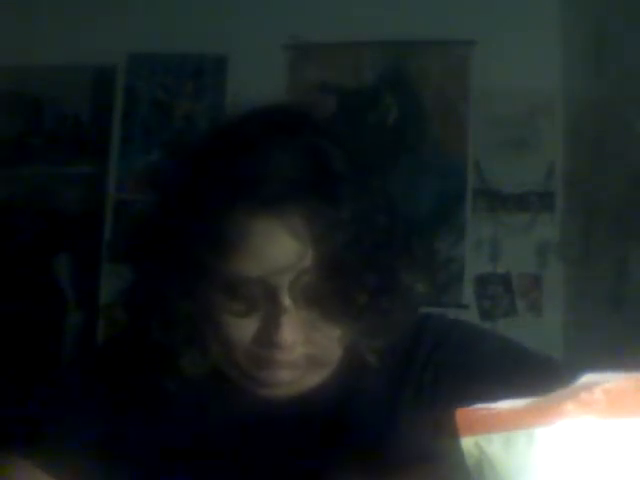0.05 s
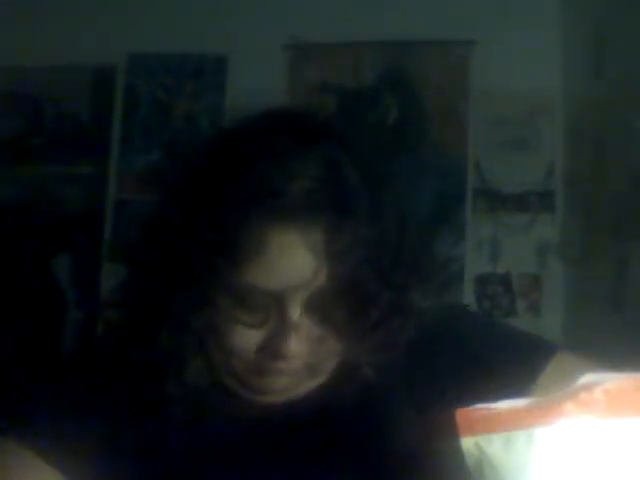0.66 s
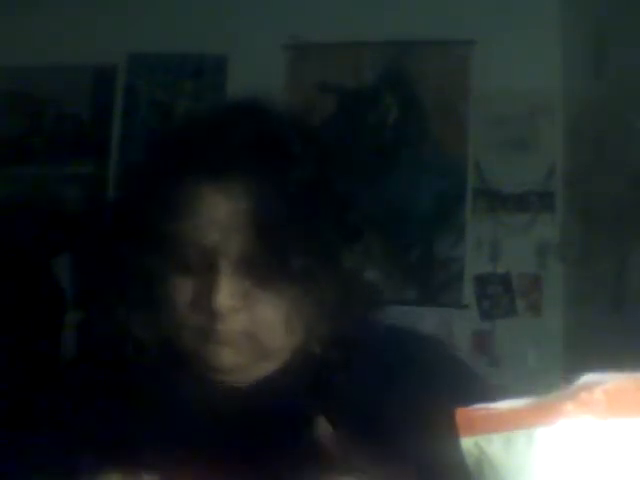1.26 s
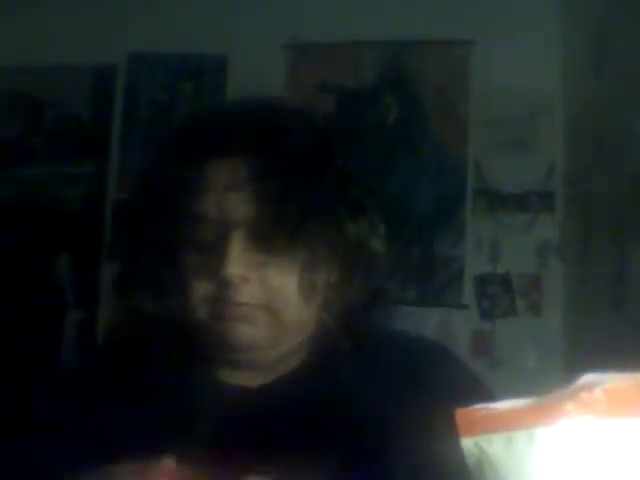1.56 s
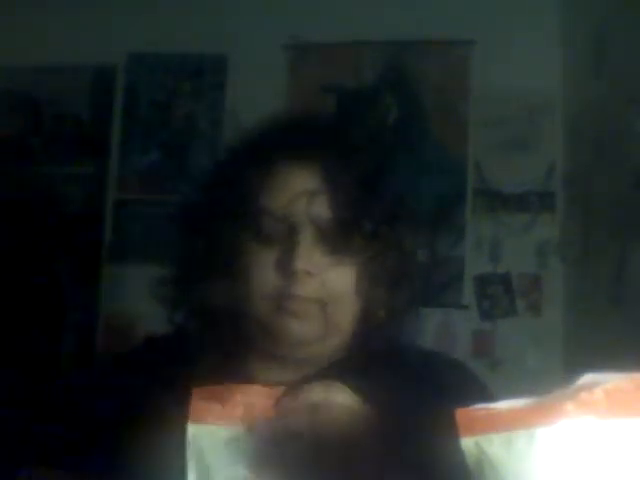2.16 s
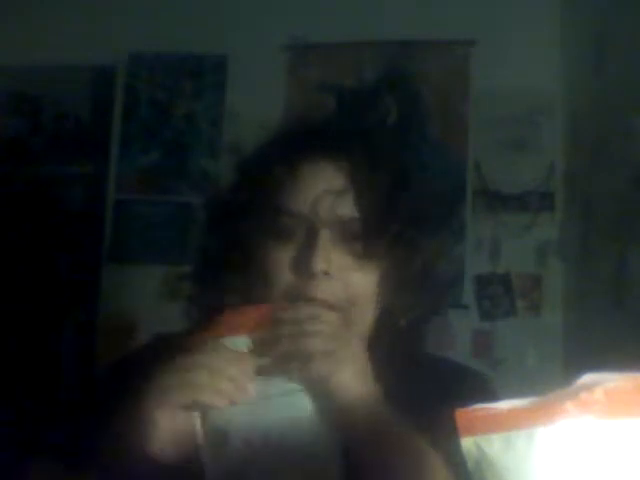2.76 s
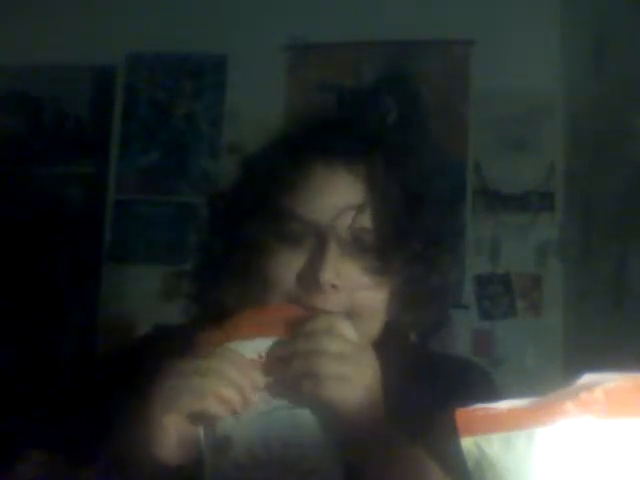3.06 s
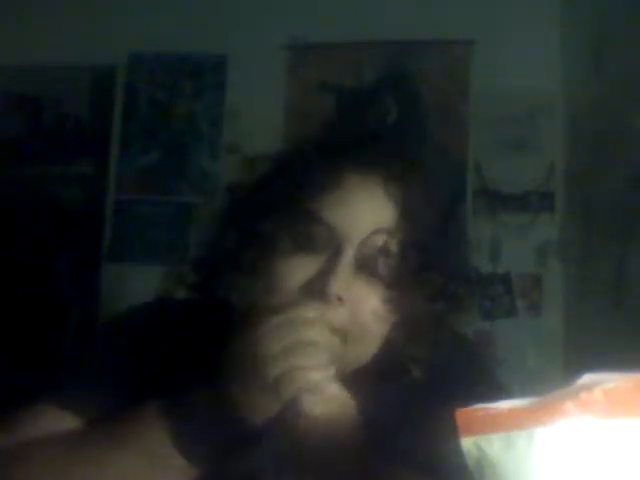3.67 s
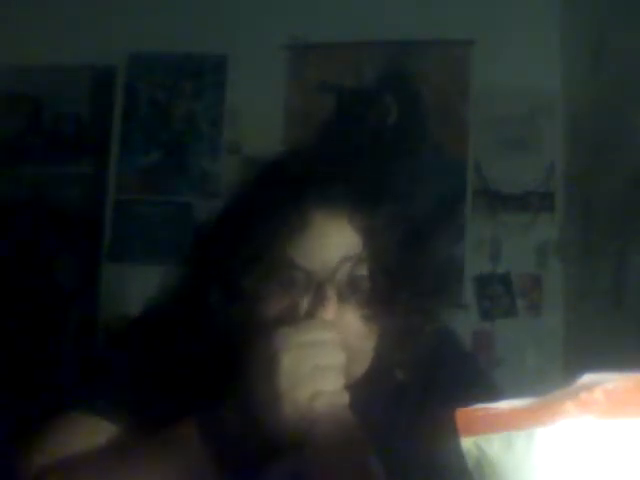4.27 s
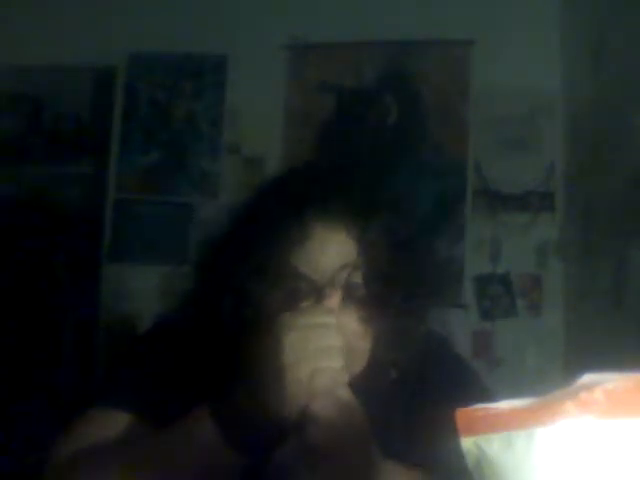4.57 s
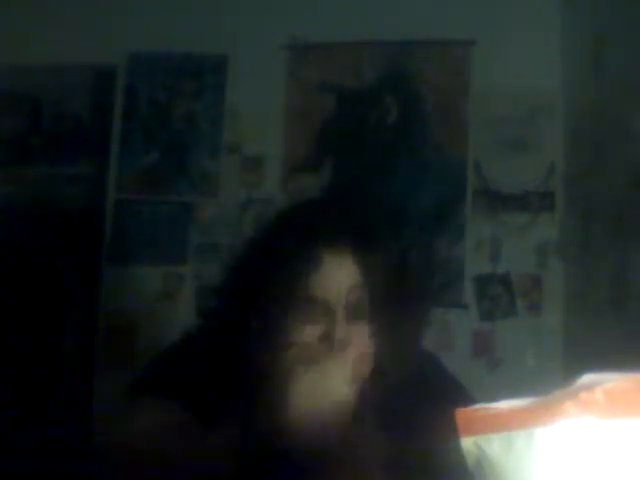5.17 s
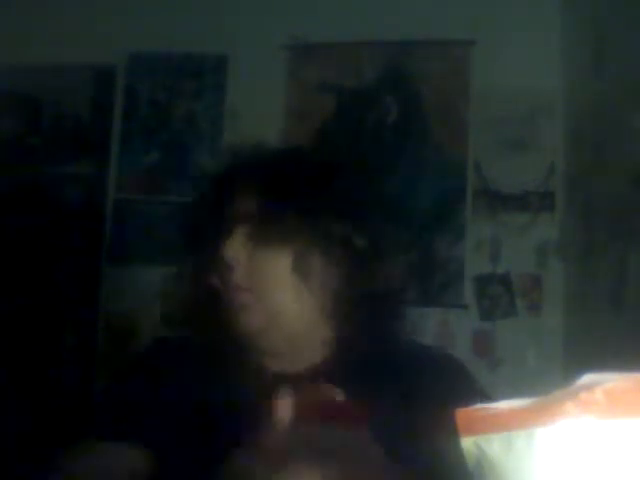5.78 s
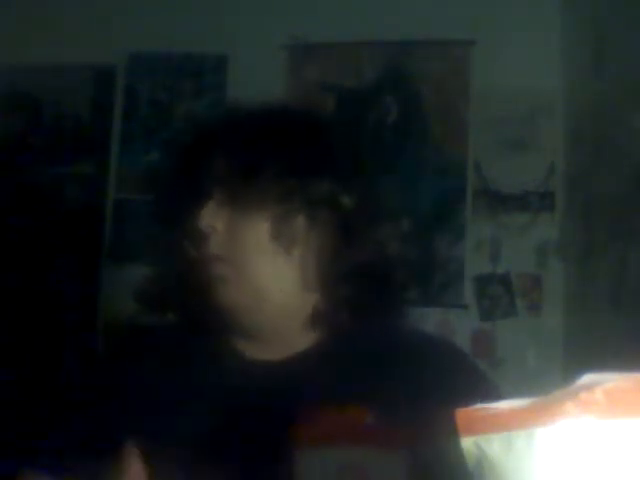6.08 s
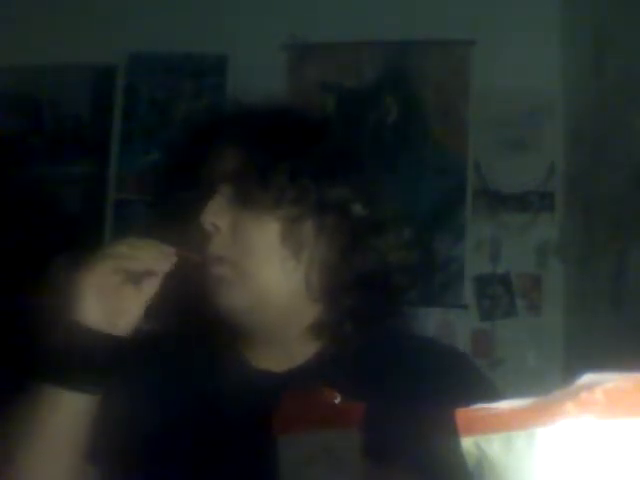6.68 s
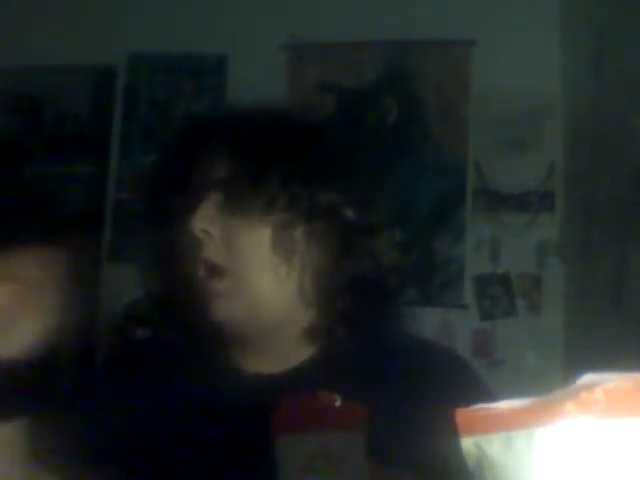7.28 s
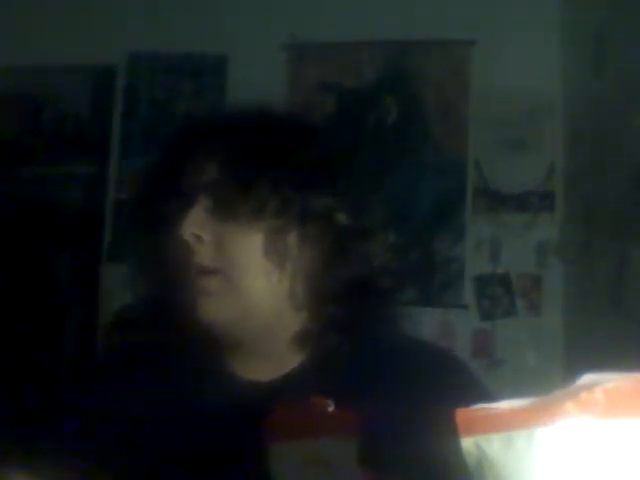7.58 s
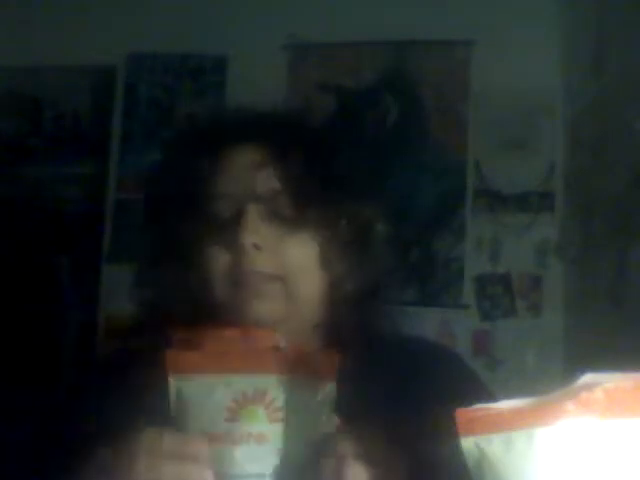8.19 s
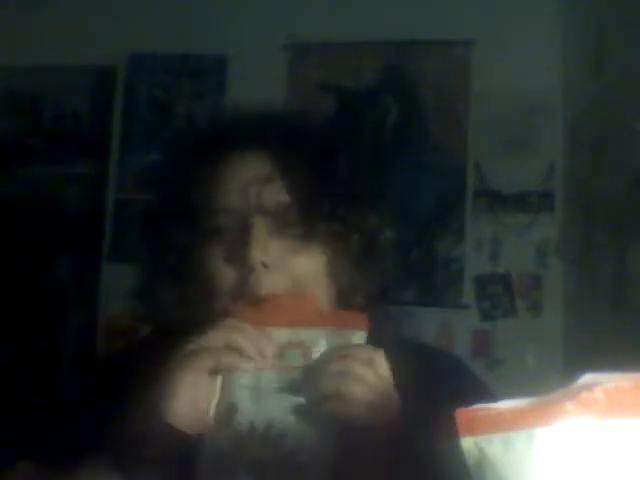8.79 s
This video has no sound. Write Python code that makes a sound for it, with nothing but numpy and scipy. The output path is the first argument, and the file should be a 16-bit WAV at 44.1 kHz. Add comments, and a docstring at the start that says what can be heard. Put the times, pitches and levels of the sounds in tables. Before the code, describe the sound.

Close, sharp crackling of a plastic snack bag being tugged open, with one short rip, a pause, then more crinkling.

```python
"""In a bedroom, a stiff plastic snack bag is handled, bitten and pulled close to a small microphone.
Creases snap by buckling, each exciting a sharp crack, a panel ring and a thud of air, over the fine
rustle of flipping wrinkles, soft dull knocks and low hollow pops of the bag. A little after five
seconds a bit of the top tears off with a jerk; after a pause the bag is picked up again.
The room adds a short reverberation, and hiss and a low hum lie underneath."""
import sys
import numpy as np
from scipy import signal
from scipy.fft import rfft, irfft
from scipy.io import wavfile

SR = 44100
rng = np.random.default_rng(int(sys.argv[2]) if len(sys.argv) > 2 else 0)


def generate_wav(signal):
    """Clip the signal to [-1, 1] and save it as 16-bit WAV at the path in sys.argv[1]."""
    frames = np.transpose(np.atleast_2d(signal))
    scaled = np.clip(frames, -1, 1) * 32767
    pcm = np.round(scaled).astype(np.int16)
    wavfile.write(sys.argv[1], SR, pcm)


N = 398663

# spectrum of the bag, with its hollow body and the microphone's treble peak: frequency_hz, density_db
BAG_SPECTRUM = [(90, -16), (200, -11), (300, -14), (520, 2.5), (750, -8.5), (1400, -6.5), (1900, -14.5),
                (2500, -10.5), (3500, -15), (5000, -13.5), (7500, -9), (9400, 0), (11500, -16.5),
                (15500, -30.5)]
# the bag's voices (crack, panel ring, thud): low_hz, high_hz, snap_length_s, first_buckle_weight
VOICES = [(4300, 17400, .0013, 0.3), (718, 4750, 0.0033, 0.42), (85.5, 1260, 0.0042, 0.73)]
def bag_voices(size=1024):
    """Minimum-phase impulse response: the bag's answer to one tiny buckle, split into its three voices."""
    cepstrum = irfft(np.log(gain_at(BAG_SPECTRUM, np.fft.rfftfreq(size, 1 / SR))))
    cepstrum[1:size // 2] *= 2
    cepstrum[size // 2 + 1:] = 0
    response = irfft(np.exp(rfft(cepstrum)))
    return [band(response, low_hz, high_hz) for low_hz, high_hz, *_ in VOICES]

def buckling(voices, creases, strain_s=0.00077, settle_s=0.011, panel_hz=1300, size=1200):
    """Snap-through buckling: a crease yields in a run of tiny buckles whose spacing colours the snap."""
    lead = size // 6
    out, t = np.zeros(N + 2 * size), (np.arange(size) - lead) / SR
    # faint ticks as the film strains beforehand and settles afterwards
    ticks = np.where(t < 0, from_db(-25) * np.exp(t / strain_s), from_db(-23) * np.exp(-t / settle_s))
    for k, (voice, (_, _, length_s, first_weight)) in enumerate(zip(voices, VOICES)):
        buckles = rng.standard_normal((len(creases), size))
        envelope = (t >= 0) * np.exp(-(t / length_s) ** 2)
        forces = buckles * (envelope + ticks * abs(buckles))
        # the first buckle is the big one, and it pushes most of the air
        forces[:, lead] += first_weight * np.linalg.norm(forces, axis=1)
        for (start_s, *levels_db), force in zip(creases, forces):
            snap = signal.fftconvolve(force, voice)
            if k == 1:  # panel voice: small panels move little air and ring higher
                crack_db, panel_db, thud_db = levels_db
                octaves = np.clip((panel_db - thud_db) / 16, -.5, 1)
                hardness = min(1, from_db(crack_db - panel_db))
                snap = panel_ring(snap, panel_hz * 2 ** octaves, hardness)
            start = max(int(start_s * SR) - lead, 0)
            out[start:start + len(snap)] += burst_at_level(snap, levels_db[k])
    return out[:N]

def panel_ring(x, hz, hardness, ring_gain=0.42, width_share=0.61):
    """Damped resonance: a stiff panel favours one broad pitch; a soft buckle sounds little else."""
    return hardness * x + ring_gain * resonate(x, hz, width_share * hz)

# creases snapping, and a faint tick in the pause: start_s, crack_db, panel_db
SNAPS = [(0.356, -28.5, -32), (0.3806, -17, -39.5), (0.5563, -15, -29.5), (0.6168, -22.5, -29),
         (0.6381, -19, -30), (0.8723, -36.5, -34), (0.9286, -27, -32.5), (1.0476, -28, -29),
         (1.3409, -37, -38), (1.4974, -21, -21), (1.531, -16, -18), (1.5633, -18.5, -24.5),
         (1.6035, -20, -25), (1.6782, -26.5, -31.5), (1.7095, -18.5, -27), (1.7983, -31, -38.5),
         (1.8233, -15.5, -29), (1.9334, -26.5, -36), (2.0253, -27, -25.5), (2.0915, -21, -28),
         (2.0981, -10.5, -27), (2.147, -18.5, -37), (2.1759, -13.5, -38), (2.221, -31, -30),
         (2.3931, -26, -29.5), (2.443, -25.5, -24.5), (2.509, -33.5, -29), (2.6282, -17, -27.5),
         (2.6449, -13.5, -26.5), (2.7229, -20.5, -28.5), (2.8064, -27, -32.5), (2.838, -35.5, -33),
         (2.9196, -28.5, -35), (2.9833, -28.5, -32), (3.1772, -15.5, -24.5), (3.253, -22, -27),
         (3.4956, -17.5, -20), (3.8145, -32.5, -28), (3.8594, -20.5, -23.5), (3.8853, -11.5, -21),
         (3.9239, -16.5, -27), (4.0152, -26.5, -35.5), (4.4228, -33, -40), (4.4745, -23.5, -35.5),
         (4.7462, -41.5, -38.5), (5.5082, -40, -37), (6.9432, -44, -42), (8.3351, -39, -27),
         (8.5029, -34, -28.5), (8.5718, -35.5, -28), (8.596, -35.5, -32), (8.7254, -32, -27.5),
         (8.8465, -32.5, -24), (8.9135, -26, -28.5), (8.9179, -16.5, -26), (8.9667, -24, -21.5),
         (9.0102, -17.5, -27.5)]
# thud relative to panel ring, falling as the bag is pressed flat: time_s, level_db
HOLLOWNESS = [(0.5, 5), (1.5, -4.5), (3.0, -10.5), (9.0, -10.5)]
def snaps_with_thuds(bright):
    """Air displacement: each snap, listed or random, gains a thud level set by how hollow the bag is."""
    return [(start_s, crack_db, panel_db, panel_db + in_time(HOLLOWNESS, start_s))
            for start_s, crack_db, panel_db in SNAPS + small_creases(bright)]

def small_creases(bright, reference_per_s=20, reference_db=-45, spread_db=3, candidates=900):
    """Thinned random process: small creases give way more often and more loudly with effort."""
    at = rng.integers(0, N, candidates)
    chance = rng.random(candidates)
    scatter = np.clip(rng.standard_normal((2, candidates)), -2, 2)
    per_s = reference_per_s * (bright[at] / from_db(reference_db)) ** .75
    crack_db, panel_db = 20 * np.log10(bright[at]) + spread_db * scatter + [[5.5], [3.5]]
    gives_way = chance < per_s * N / SR / candidates
    return list(np.transpose([at / SR, crack_db, panel_db])[gives_way])

def tear(start_s=5.132, rip_s=0.0138, fizz_s=0.018, crack_db=-12, panel_db=-29):
    """Fracture of the top: two snaps, the first with the heavier thud, and the envelope of a short rip."""
    snaps = [(start_s, crack_db, panel_db, -15.5), (start_s + rip_s, crack_db, panel_db, -30)]
    return snaps, from_db(-26.5) * swell(start_s, fizz_s)

def rustle(voices, dull, bright, panel_count=10):
    """Superposed impulses: fine wrinkles fizz, coarser ones tick on panels of many sizes."""
    fine = wrinkles(per_s=5800, spread_db=5, clump_db=4.0)
    coarse = wrinkles(per_s=900, spread_db=3.5, clump_db=4.5)
    struck_panel = rng.integers(0, panel_count, N)
    panels = sum(panel_ring(coarse * (struck_panel == k) + 1e-18, hz, hardness=0.059)
                 for k, hz in enumerate(np.geomspace(900, 3600, panel_count)))
    fizz, ring, thud = (rms_one(signal.oaconvolve(force, voice)[:N])
                        for force, voice in zip((fine, panels, coarse), voices))
    return bright * from_db(1) * fizz + dull * (from_db(-3) * ring + from_db(-2) * thud)

def wrinkles(per_s, spread_db, clump_db):
    """Shot noise: tiny flips of uneven size, whose strength comes in clumps."""
    flips = rng.random(N) < per_s / SR
    size_db = spread_db * np.minimum(rng.exponential(1, N), np.pi)
    clumping_db = clump_db * np.clip(drift(160), -2, 2)
    return flips * from_db(size_db + clumping_db) * rng.choice([-1, 1], N)

# how busily the hands work the bag: time_s, level_db
HANDLING = [(0.0, -58), (0.5, -65), (0.85, -51.5), (1.15, -52.5), (1.4, -46.5), (2.35, -44), (2.8, -48.5),
            (3.03, -56), (3.4, -47.5), (3.78, -45), (4.1, -54), (4.7, -62), (6.25, -61), (6.5, -75),
            (8.15, -64), (8.35, -48.5), (8.65, -59), (9.03, -45)]
# single squeezes and strokes of the film: start_s, length_s, level_db, brightness_db
SQUEEZES = [(0.607, 0.12, -35, -7), (0.942, 0.035, -32, -14.5), (1.491, 0.145, -30.5, -7),
            (1.97, 0.1, -33, -3), (2.051, 0.063, -29, 1), (2.1, 0.13, -35, -2), (2.371, 0.13, -31.5, -8.5),
            (2.585, 0.13, -30, -11), (3.102, 0.16, -32, -1), (3.375, 0.254, -35.5, -4.5),
            (5.175, 0.125, -31.5, -8), (5.383, 0.063, -44.5, -1.5), (7.647, 0.033, -52.5, 5.5),
            (8.176, 0.1, -54.5, 8.5), (8.418, 0.056, -41, -13.5)]
def effort():
    """Incoherent addition: handling and squeezes sum in power to the dull and bright rustle envelopes."""
    bright = from_db(in_time(HANDLING, np.arange(N) / SR))
    dull = bright * from_db(-3)  # light handling has less body than fizz
    for start_s, length_s, level_db, brightness_db in SQUEEZES:
        squeeze = from_db(level_db) * swell(start_s, length_s)
        dull = np.hypot(dull, squeeze)
        bright = np.hypot(bright, squeeze * from_db(brightness_db))
    return dull, bright

def swell(start_s, length_s, skew=1.14):
    """Skewed half-sine pulse: one press of the fingers peaks a little late and lets go."""
    out, start, count = np.zeros(N), int(start_s * SR), int(length_s * SR)
    out[start:start + count] = np.sin(np.pi * (np.arange(count) / count) ** skew)
    return out

# soft dull knocks and low hollow pops of the bag: start_s, level_db, pitch_hz
KNOCKS_AND_POPS = [(0.4858, -36.5, 500), (1.1047, -28.5, 560), (1.2303, -37.5, 482), (1.5082, -22.5, 1301),
                   (2.0051, -27, 448), (2.147, -28, 500), (3.0358, -29, 2300), (3.381, -27.5, 1481),
                   (3.401, -26, 755), (3.76, -33, 1890), (4.165, -26, 1120), (4.2576, -38, 2000),
                   (4.643, -30.5, 1400), (4.888, -41, 1000), (5.7565, -39, 797), (6.054, -47.5, 1700),
                   (7.6243, -42, 450), (7.934, -41, 548), (8.433, -35.5, 1900), (8.7667, -30.5, 1500)]
def knocks_and_pops(voices, decay_cycles=2.7, first_weight=.3, width_share=.6, size=1200):
    """Damped resonance: the bag sounds around one broad pitch, with no crack; lower ones last longer."""
    out, t, body = np.zeros(N + size), np.arange(size) / SR, sum(voices[1:])
    for start_s, level_db, pitch_hz in KNOCKS_AND_POPS:
        force = rng.standard_normal(size) * np.exp(-t * pitch_hz / decay_cycles)
        force[0] += first_weight * np.linalg.norm(force)
        burst = resonate(signal.fftconvolve(force, body)[:size], pitch_hz, width_share * pitch_hz)
        start = int(start_s * SR)
        out[start:start + size] += burst_at_level(burst, level_db)
    return out[:N]

# reverberation of the bedroom: frequency_hz, t60_s, reverberant_to_direct_db
REVERBERATION = [(300, 0.22, -4.5), (1460, 0.23, -4.5), (4870, 0.2, -4.5), (9500, 0.17, -2.5)]
def bedroom(x, wall_echo_s=0.0066, desk_gain=0.77, lumpiness=0.66, size=16384):
    """Diffuse reflection: desk scatter, then dying wall echoes, shifting as the bag and hands move."""
    t = np.arange(size) / SR
    hz, t60_s, wet_db = np.transpose(REVERBERATION)
    log_bins = np.log(np.fft.rfftfreq(size, 1 / SR) + 1)
    band_gains = np.array([from_db(db) * np.interp(log_bins, np.log(hz), peak)
                           for peak, db in zip(np.eye(len(hz)), wet_db)])
    decays = from_db(-60 * t / t60_s[:, None])
    decays *= np.where(t < wall_echo_s, desk_gain, 1) * (t > wall_echo_s / 10)
    out, hop = np.zeros(N + 2 * size), size // 4
    for start in range(0, N, hop):  # a new random echo pattern for each block
        tails = decays * rng.standard_normal(size) * np.exp(lumpiness * rng.standard_normal(size))
        tails /= np.linalg.norm(tails, axis=1, keepdims=True)
        response = irfft(np.sum(band_gains * rfft(tails), axis=0))
        echoes = signal.fftconvolve(x[start:start + hop], response[:size - hop])
        out[start:start + len(echoes)] += echoes
    return out[:N]

# spectrum of microphone hiss and room rumble: frequency_hz, relative_density_db
HISS_SPECTRUM = [(25, -17), (48, -4), (80, -16), (220, -6.5), (300, -15.5), (490, -10), (680, -14.5),
                 (830, -14), (1500, -20.5), (3500, -32), (6500, -32), (9400, -22), (11500, -33),
                 (15500, -37)]
# resonances of the low hum: pitch_hz, half_width_hz, level_db
HUM_BANDS = [(46, 21, -61), (119.73, 2.07, -56), (138.1, 7.8, -59)]
def background(hiss_db=-51.5):
    """Filtered noise: a broad spectrum gives hiss and rumble, narrow bands give a wavering hum."""
    hiss = irfft(rfft(rng.standard_normal(N)) * gain_at(HISS_SPECTRUM, np.fft.rfftfreq(N, 1 / SR)), N)
    hum = np.zeros(N)
    for pitch_hz, half_width_hz, level_db in HUM_BANDS:
        noise = rng.standard_normal(N + SR)  # an extra second lets the resonance build up
        for _ in range(2):
            noise = resonate(noise, pitch_hz, 2 * half_width_hz)
        hum += from_db(level_db) * rms_one(noise[SR:])
    return from_db(hiss_db) * rms_one(hiss) + hum

def from_db(db):
    """Amplitude ratio of a level in decibels."""
    return 10 ** (np.asarray(db) / 20)

def rms_one(x):
    """Normalisation to unit mean power."""
    return x / np.sqrt(np.mean(x ** 2) + 1e-20)

def burst_at_level(x, level_db, span_s=.005):
    """Equivalent level: the burst gets the energy of a steady level_db lasting span_s."""
    return from_db(level_db) * x * np.sqrt(span_s * SR / np.sum(x ** 2))

def band(x, low_hz, high_hz):
    """Causal band-pass filtering."""
    return signal.sosfilt(signal.butter(2, [low_hz, high_hz], "band", fs=SR, output="sos"), x)

def resonate(x, hz, width_hz):
    """Two-pole resonance with unit peak gain."""
    radius = np.exp(-np.pi * width_hz / SR)
    feedback = [1, -2 * radius * np.cos(2 * np.pi * hz / SR), radius ** 2]
    return signal.lfilter(np.array([1, 0, -1]) * (1 - radius ** 2) / 2, feedback, x)

def gain_at(spectrum, hz):
    """Gain of a spectrum, interpolated in decibels over log frequency."""
    points_hz, points_db = np.transpose(spectrum)
    return from_db(np.interp(np.log(hz + 1), np.log(points_hz), points_db))

def in_time(curve, time_s):
    """Linear interpolation of a curve in time."""
    return np.interp(time_s, *np.transpose(curve))

def drift(knots_per_s):
    """Random modulation of unit rms, interpolated between knots."""
    knots = rng.standard_normal(int(N / SR * knots_per_s) + 2)
    return rms_one(np.interp(np.arange(N) / SR * knots_per_s, np.arange(len(knots)), knots))

def scene():
    """Superposition of the bag's direct sound, its reverberation and the background."""
    voices = bag_voices()
    dull, bright = effort()
    noise_floor = background()
    tear_snaps, rip = tear()
    bag = rustle(voices, dull + rip, bright + rip * from_db(11.5))  # the rip is mostly fizz
    bag += knocks_and_pops(voices)
    bag += buckling(voices, tear_snaps + snaps_with_thuds(bright))
    return (bag + bedroom(bag) + noise_floor)[None]

def record(dry, ceiling=.74, cutoff_hz=16000):
    """Soft saturation rounds off the loudest cracks, and a steep low-pass cuts the highest treble."""
    rounded = dry / (1 + (dry / ceiling) ** 4) ** .25
    return signal.sosfilt(signal.ellip(10, .2, 80, cutoff_hz, fs=SR, output="sos"), rounded)

dry = scene()
out = record(dry)
generate_wav(out)
```